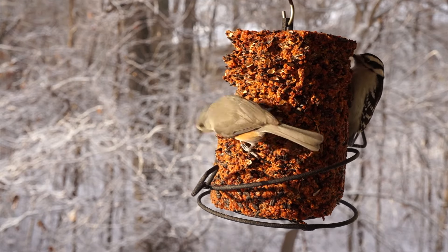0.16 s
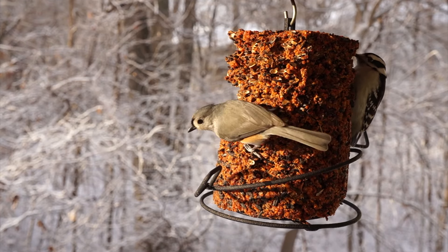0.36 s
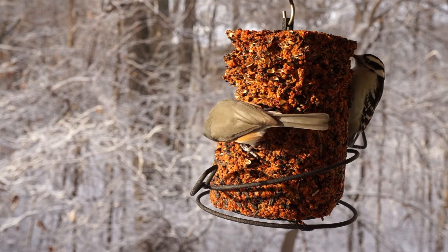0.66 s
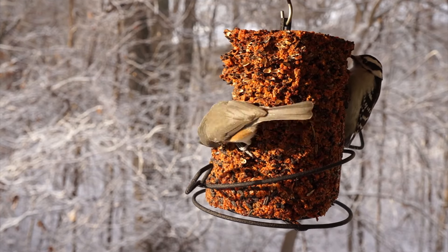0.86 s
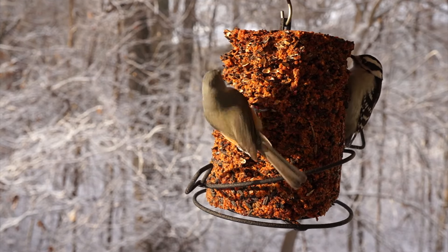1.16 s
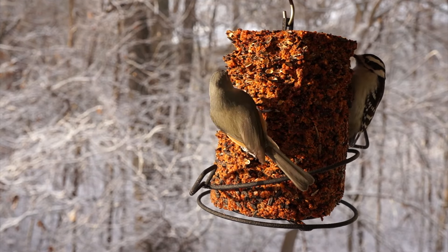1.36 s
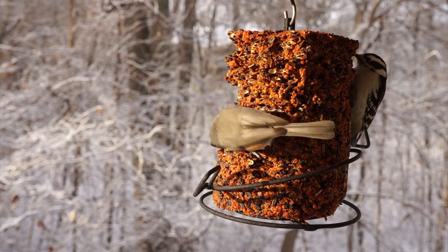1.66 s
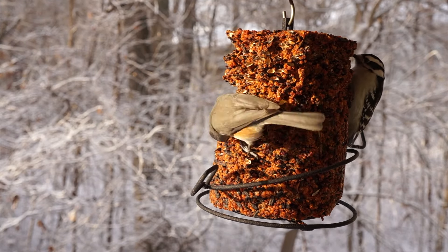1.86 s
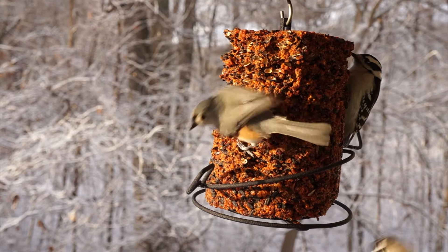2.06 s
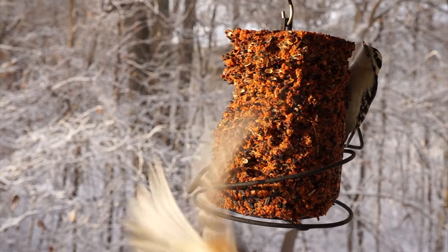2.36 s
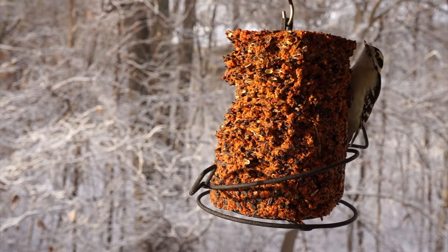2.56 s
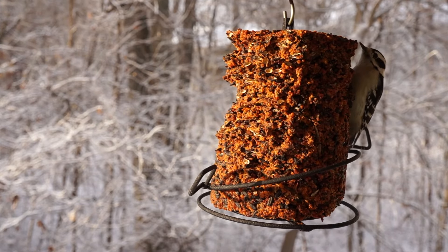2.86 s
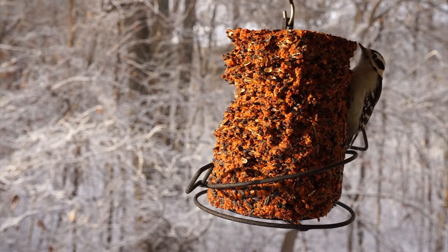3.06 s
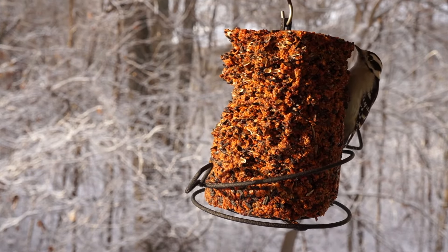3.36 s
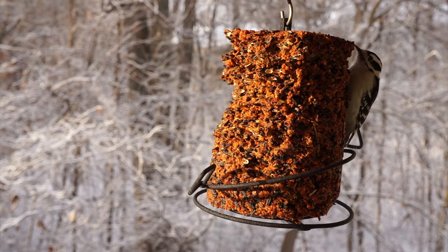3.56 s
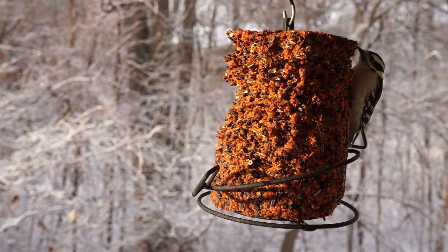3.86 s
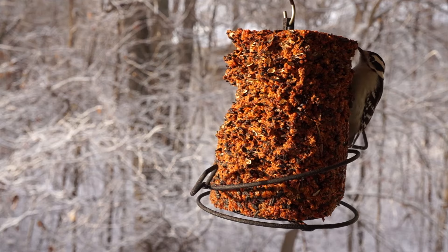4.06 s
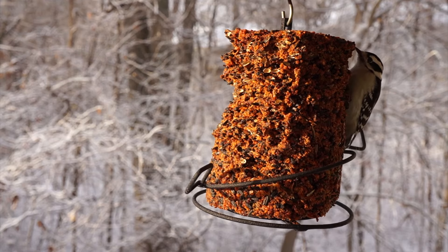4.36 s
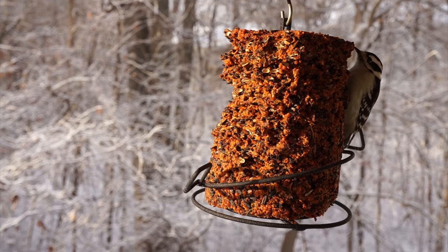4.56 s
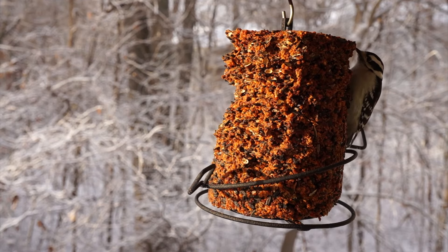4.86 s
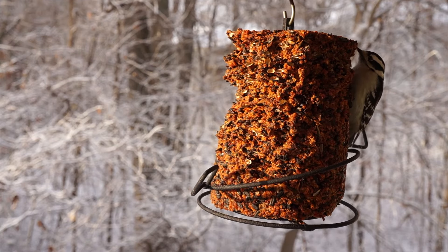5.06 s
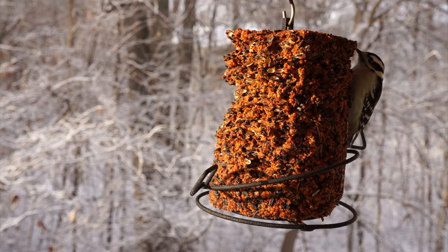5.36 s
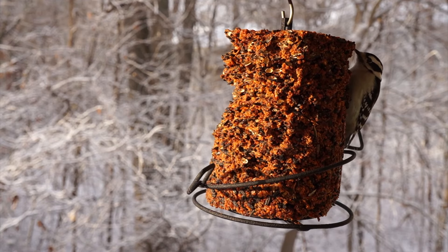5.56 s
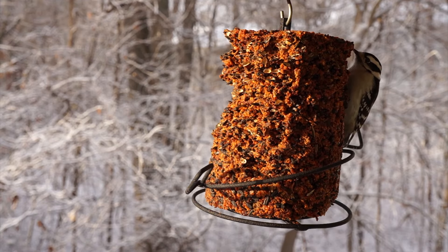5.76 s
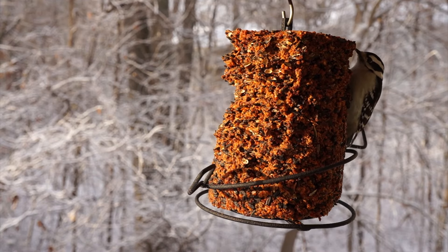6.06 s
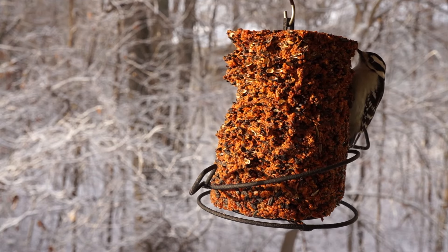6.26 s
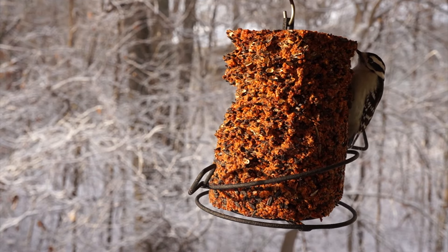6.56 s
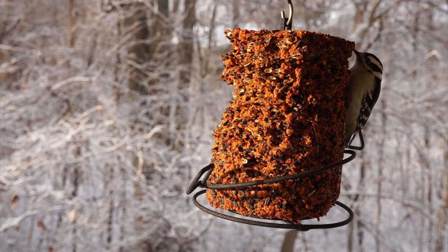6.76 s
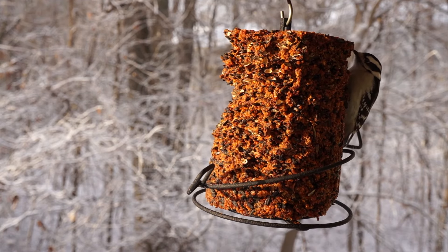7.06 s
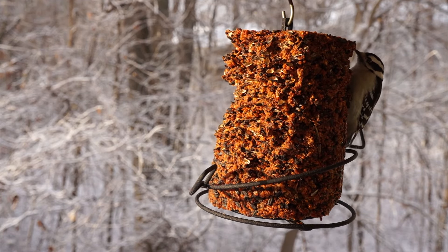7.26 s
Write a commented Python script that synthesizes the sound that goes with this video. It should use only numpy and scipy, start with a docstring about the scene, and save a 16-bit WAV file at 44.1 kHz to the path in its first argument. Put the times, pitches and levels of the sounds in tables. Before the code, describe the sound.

A soft, deep rumble with a fuzzy hum, like distant traffic, lies under everything in open winter woods. From the start a bird pecks sparsely at the seed cake, light woody ticks with a short echo among trees. Very faint tones ring away, a low drone swells and fades around 1-3.2 s, and tiny high chirps sound at 1.3 s. At 2.3 s wings flutter past: rapid feathery swishes, bassy air puffs and slaps until about 3 s. A strong gust and loud knocks then open a close, brittle burst of cracking and scraping at 3.0-3.3 s; the background dips briefly after sharp cracks. Smaller snaps follow to 4 s, crisp clicks around 4.2-4.4 s and crunching with a dull thud at 4.7 s. A quieter gap holds faint chirps near 5.3 s. Dense crackling and knocks return at 5.8-6.4 s, then five faint wingbeats from 6.6 s and rumble.

```python
"""Small birds at a seed-cake feeder in winter woods, 7.4 s, over a distant rumble (shaped noise plus hum).
From the start a bird pecks farther off (struck resonances, woodland echo); two faint tones ring away, a low
drone passes at 1-3.2 s and calls (bent sines) sound from 1.3 s. At 2.3 s wings flutter past (pulsed noise, air
slaps); from 3.0 s husks crack and scrape close by (slips through resonances) over dull knocks (damped swings).
Five faint wingbeats end it at 6.6 s. The recorder's limiter ducks everything after the sharpest cracks."""
import sys
import numpy as np
from scipy import signal
from scipy.io import wavfile
from scipy.ndimage import uniform_filter1d

SR = 44100
rng = np.random.default_rng(int(sys.argv[2]) if len(sys.argv) > 2 else 0)


def transcribe(signal):
    """Save signal, clipped to [-1, 1], as a 16-bit WAV file at the path in sys.argv[1]."""
    frames = np.atleast_2d(signal).T
    limited = np.clip(frames, -1, 1)
    pcm = np.round(limited * 32767).astype(np.int16)
    wavfile.write(sys.argv[1], SR, pcm)


N = 326340

# rumble spectrum: f/Hz, density/dB per Hz (relative)
RUMBLE_SPECTRUM = [(15, -28), (30, -25.5), (80, -3.5), (160, 0), (300, -7.5), (1000, -14), (1500, -22.5),
                   (4000, -40.5), (11000, -43)]
# rumble left-right likeness: f/Hz, correlation/1
RUMBLE_LIKENESS = [(150, 1), (400, 0.9), (1200, 0.65), (3000, 0.7), (8000, 1)]
# slow course of the rumble: t/s, level/dB
RUMBLE_SWELL = [(0, -36), (5, -36), (5.7, -35), (6.6, -38.5), (7.4, -39)]
# husk resonances: f/Hz, width/Hz, level/dB (relative)
HUSK_MODES = [(1430, 3100, -7.5), (2450, 700, 3.5), (3714, 850, 1.5), (3797, 94, -3.5), (4760, 2760, 4.5),
              (6770, 1840, 1.5), (8180, 1200, 2), (10830, 4300, 2)]
# beak blows on the cake, farther off: t/s, level/dB (relative)
PECK_BLOWS = [(0.0034, -46.5), (0.6541, -41.5), (0.8313, -44), (0.948, -49), (1.7114, -43.5),
              (1.959, -39.5), (2.142, -47.5), (2.3104, -36), (2.3194, -34), (3.285, -40.5), (3.3563, -36),
              (4.333, -44), (5.3875, -53.5), (5.985, -49.5), (6.816, -57)]
# faint far tones, dying slowly: t/s, f/Hz, level/dB
RINGING_TONES = [(0.029, 1590, -49.5), (0.581, 1330, -55)]
# course of the passing drone: t/s, f/Hz, level/dB
DRONE_PATH = [(1, 190, -72), (1.6, 189.9, -41), (2.2, 190.2, -38), (3.2, 188, -51.5)]
# calls in the trees: t/s, length/s, first f/Hz, middle f/Hz, last f/Hz, level/dB (relative)
TREE_CALLS = [(1.293, 0.015, 6200, 7260, 7500, -47.5), (1.343, 0.041, 7550, 8170, 8350, -60),
              (5.263, 0.034, 7200, 7860, 8500, -59), (5.433, 0.1, 7750, 7200, 7500, -65)]
# wingbeats of the departing bird, then two lurches of air at the feeder:
# t/s, feather swish level/dB, air push level/dB (both relative)
WINGBEATS = [(2.273, -29, -40), (2.321, -33, -24), (2.355, -38, -34), (2.391, -30.5, -19),
             (2.439, -36, -37), (2.48, -33.5, -20.5), (2.525, -34.5, -18), (2.574, -37, -26),
             (2.62, -34.5, -22), (2.667, -37.5, -24.5), (2.726, -38, -26.5), (2.767, -31.5, -17.5),
             (2.811, -32, -19.5), (2.855, -33, -20.5), (2.919, -33.5, -19), (2.957, -45, -34.5),
             (3.083, -23.5, -6.5), (3.143, -24, -16)]
# feather swish spectrum: f/Hz, density/dB per Hz (relative)
SWISH_SPECTRUM = [(200, -14), (400, 0.5), (1800, -8.5), (4000, -21), (11000, -23)]
# feather swish left-right likeness: f/Hz, correlation/1
SWISH_LIKENESS = [(300, .3), (2500, .4), (7000, .9)]
# air push spectrum: f/Hz, density/dB per Hz (relative)
PUSH_SPECTRUM = [(15, 2.0), (55, -3.5), (200, -11.0), (700, -32.5), (3000, -84)]
# air push left-right likeness: f/Hz, correlation/1
PUSH_LIKENESS = [(60, 0.96), (300, 0.37)]
# sudden slaps of air within the flutter: t/s, level/dB (relative)
AIR_SLAPS = [(2.288, -15), (2.483, -16), (2.802, -22), (2.848, -9)]
# husks snapping close by: t/s, level/dB (relative), treble over body/dB
HUSK_SNAPS = [(3.028, -27.5, 18), (3.042, -22, 10), (3.183, -13, 0), (3.218, -13.5, 2), (3.264, -24, -9),
              (3.375, -26.5, -7), (3.432, -42.5, -11), (3.531, -29, -11), (3.561, -29.5, -6),
              (3.572, -37, 4), (3.597, -25, 7), (3.874, -28.5, -1), (3.9585, -25.5, 0), (4.309, -29.5, -27),
              (4.353, -33, -2), (4.395, -31, -4), (4.4, -29, 3), (4.465, -41, -9), (4.724, -27.5, -18),
              (4.756, -19.5, -9), (4.815, -27.5, 7.5), (5.821, -32.5, 9), (5.885, -30, -2), (5.934, -26, 7),
              (5.96, -40, 11), (6.143, -20.5, 3.5), (6.225, -19, -12), (6.298, -18, 9), (6.307, -20, 8),
              (6.337, -28, 6), (6.422, -24, 6)]
# beak scraping and crunching close by: t/s, length/s, level/dB (relative), treble over body/dB
BEAK_SCRAPES = [(3.035, 0.0087, -38, 17), (3.045, 0.0092, -24, 14), (3.055, 0.031, -18.5, 8.5),
                (3.096, 0.0088, -20, 9), (3.132, 0.028, -27.5, 0), (3.156, 0.017, -21, 2),
                (3.168, 0.016, -20.5, -16), (3.204, 0.0088, -18, -1), (3.228, 0.018, -37, 4),
                (3.535, 0.029, -54, 1), (3.588, 0.0036, -16, 11), (3.859, 0.012, -44.5, -1),
                (3.896, 0.0091, -32, -10), (3.92, 0.031, -46, 9), (4.1555, 0.0047, -23, -5),
                (4.251, 0.0067, -28, 8), (4.261, 0.0054, -13.5, 12.5), (4.679, 0.034, -39.5, 2.5),
                (4.734, 0.016, -42, 0), (4.76, 0.02, -29.5, 4.5), (4.784, 0.025, -36, 8),
                (5.834, 0.043, -37.5, -1), (5.899, 0.029, -31, -8), (6.105, 0.021, -29.5, -1),
                (6.134, 0.0044, -27.5, 15), (6.146, 0.037, -30.5, 7), (6.175, 0.018, -26, 8),
                (6.193, 0.022, -22, 2), (6.213, 0.024, -27.5, 8), (6.245, 0.012, -21, 6.5),
                (6.26, 0.014, -24, -7), (6.275, 0.022, -32, -8), (6.345, 0.0071, -21.5, 8),
                (6.363, 0.03, -41.5, -10), (6.4, 0.018, -26.5, 8)]
# dull knocks through the feeder: t/s, level/dB (relative)
FEEDER_KNOCKS = [(3.035, -16), (3.104, -5.5), (3.208, -9), (3.258, -18.5), (3.897, -19), (3.921, -21.5),
                 (4.722, -17.5), (5.897, -23), (5.924, -19), (6.109, -22), (6.1345, -17.5), (6.138, -19),
                 (6.16, -29), (6.246, -17.5), (6.29, -23)]

SNAP_S, DYING_DB_PER_S = 0.0025, 6995  # length of a snap; extra decay once any husk event has run its length
RINGING_DB_PER_S = -26
CALL_ENDS_DB, CALL_OPENING = 2, 0.42  # boost at both ends of a call; share over which the opening boost fades
FAR_FLIGHT_S, FAR_BEAT_S, FAR_BEAT_DB = 6.62, 0.0448, -45  # start, spacing, level of five even beats
LIMIT_DB, ATTACK_SAMPLES = -20.5, 130  # threshold; slow enough to let the first edge of a crack through
QUICK_S, SLOW_S = 0.082, 0.71  # limiter recovery time constants
EDGE_HZ = 11080  # band limit


def amp(db):
    """Gain of a dB value."""
    return 10 ** (np.asarray(db) / 20)


def evened(x):
    """Scales to rms 1."""
    return x / np.sqrt(np.mean(x ** 2) + 1e-20)


def drift(count, size):
    """Twice-smoothed random course of rms 1."""
    once = uniform_filter1d(rng.standard_normal(count), size=size)
    return evened(uniform_filter1d(once, size=size))


def read(points, hz):
    """Reads a spectrum table on a log-frequency axis."""
    f, value = np.transpose(points)
    return np.interp(np.log(hz + 1), np.log(f + 1), value)


def add(mix, start_s, sound):
    """Mixes a sound in at start_s, cut at the end of the mix."""
    part = mix[..., round(start_s * SR):][..., :sound.shape[-1]]
    part += sound[..., :part.shape[-1]]


def ring(x, hz, width_hz):
    """Fixed resonance that keeps the power of white noise."""
    r = np.exp(-np.pi * width_hz / SR)
    pole = r * np.exp(2j * np.pi * hz / SR)
    return np.sqrt(2 * (1 - r * r)) * signal.lfilter([1], [1, -pole], x).real


def steep(x, hz, width_hz):
    """Resonance applied twice, so the valleys beside it stay dark."""
    return np.sqrt(2 * np.pi * width_hz / SR) * ring(ring(x, hz, width_hz), hz, width_hz)


def noise(spectrum, likeness, patchy_db):
    """Stereo noise of rms 1 from random short-time spectra with drifting patches."""
    frames, hz = N // 256 + 5, np.fft.rfftfreq(1024, 1 / SR)
    a, b, c, d, patches = rng.standard_normal((frames, 513, 5)).T
    patches = uniform_filter1d(patches, size=10, axis=0)  # across frequency
    patches = evened(uniform_filter1d(patches, size=12, axis=1))  # across time
    same = np.clip(read(likeness, hz), -1, 1)[:, None]
    left = a + 1j * b
    right = same * left + np.sqrt(1 - same ** 2) * (c + 1j * d)
    level_db = read(spectrum, hz)[:, None] + patchy_db * patches
    z = np.array([left, right]) * amp(level_db)
    return evened(signal.istft(z, nperseg=1024, noverlap=768)[1][:, :N])


def woods(x, t60_s):
    """Echoes from trunks: a dying tail of random taps, another for each ear."""
    t = np.arange(SR // 2) / SR
    tail = rng.standard_normal((2, len(t))) * amp(-60 * t / t60_s)
    return signal.fftconvolve(x[None], tail / np.linalg.norm(tail[0]), axes=1)[:, :N]


def whistle(rows, waver):
    """Start time and samples of a near sine with wavering pitch; rows are t/s, f/Hz, level/dB."""
    s, hz, db = np.transpose(rows)
    t = np.arange(s[0], s[-1], 1 / SR)
    wobble = evened(uniform_filter1d(rng.standard_normal(len(t)), size=400))
    turns = np.cumsum(np.interp(t, s, hz) * (1 + waver * wobble)) / SR
    level = np.sqrt(2) * amp(np.interp(t, s, db))
    return s[0], level * np.sin(2 * np.pi * turns) * signal.windows.tukey(len(t), .015)


def husk(rows, slips_per_s, spread_db, grit, turn_db):
    """Runs of small uneven slips drive the modes, whose mix shifts as the husk turns in the beak."""
    modes = len(HUSK_MODES)
    treble = np.tanh(2 * np.log2(np.array(HUSK_MODES)[:, 0] / 5300)) / 2  # body -0.5, treble +0.5
    turning = evened(uniform_filter1d(rng.standard_normal((N // 100 + 1, modes)), size=8, axis=0))
    turning = np.repeat(amp(turn_db * turning.T), 100, axis=1)[:, :N]

    slips = amp(spread_db * np.minimum(rng.exponential(1, N), 3))
    slips *= rng.random(N) < slips_per_s / SR
    slips = evened(slips * rng.choice([-1., 1.], N)) + grit * rng.standard_normal(N)
    slips *= amp(1.6 * drift(N, 200))  # clumps of slips

    drive = np.zeros((modes, N))
    for s, length_s, db, treble_db in rows:
        t = np.arange(round((length_s + .008) * SR)) / SR
        rise = np.minimum(t / min(.35 * length_s, .007), 1) ** 2
        decay_db = -2 * t / length_s - DYING_DB_PER_S * np.maximum(t - length_s, 0)
        run = rise * amp(decay_db) * slips[round(s * SR):][:len(t)]
        run /= np.sqrt(np.sum(run ** 2) / (length_s * SR))
        add(drive, s, amp(db) * evened(amp(treble * treble_db))[:, None] * run)

    gains = amp([db for _, _, db in HUSK_MODES])
    gains /= np.linalg.norm(gains)
    gains *= (-1.) ** np.arange(modes)  # alternating polarity
    return sum(gains[k] * steep(drive[k] * turning[k], hz, width_hz)
               for k, (hz, width_hz, _) in enumerate(HUSK_MODES))


def swings():
    """Time, slow swing and quick jolt: damped sines that start as a pull."""
    t = np.arange(2000) / SR
    swing = -np.sin(2 * np.pi * 280 * t) * np.exp(-500 * t)
    jolt = -np.sin(2 * np.pi * 520 * t) * np.exp(-1100 * t)
    return t, swing, jolt


def rumble():
    """Distant traffic and air with a deep fuzzy hum, swelling slowly, a little stronger on the left."""
    s, db = np.transpose(RUMBLE_SWELL)
    hum = amp(-6.5) * evened(steep(rng.standard_normal(N), 53.8, 7.3))
    level_db = np.interp(np.arange(N) / SR, s, db) + [[.5], [-.5]]
    return amp(level_db) * (noise(RUMBLE_SPECTRUM, RUMBLE_LIKENESS, patchy_db=0.88) + hum)


def pecks():
    """Short distant blows: a sharp tick, the husk's crack, a brief low ring and a woodland tail."""
    ticks = np.zeros(N)
    for s, db in PECK_BLOWS:
        add(ticks, s, amp(db) * np.ones(1))
    rows = [(s, SNAP_S, db, -9) for s, db in PECK_BLOWS]
    crack = husk(rows, slips_per_s=4000, spread_db=2, grit=1, turn_db=1.5)
    tick = amp(19.5) * ring(ticks, 3000, 5000)
    low_ring = amp(20) * steep(ticks, 1524, 170)
    blows = amp(1.0) * crack + tick + low_ring
    return blows + amp(0.5) * woods(blows, t60_s=0.22)


def ringing():
    """Two faint tones far off, each a near sine dying for a second."""
    out = np.zeros(N)
    for s, hz, db in RINGING_TONES:
        add(out, *whistle([(s, hz, db), (s + 1, hz, db + RINGING_DB_PER_S)], waver=0.0014))
    return out


def drone():
    """A low wavering near sine that swells and fades as it passes."""
    out = np.zeros(N)
    add(out, *whistle(DRONE_PATH, waver=0.027))
    return out


def calls():
    """Near sines, each one smooth bend of pitch, smeared by the trees."""
    out, u = np.zeros(N), np.linspace(0, 1, num=9)
    for s, length_s, first_hz, middle_hz, last_hz, db in TREE_CALLS:
        hz = first_hz * (1 - u) * (1 - 2 * u)  # parabola through the three pitches
        hz += middle_hz * 4 * u * (1 - u) + last_hz * u * (2 * u - 1)
        level_db = db + CALL_ENDS_DB * np.maximum(1 - u / CALL_OPENING, u)
        add(out, *whistle(np.transpose([s + length_s * u, hz, level_db]), waver=.008))
    return amp(-3) * out + woods(out, t60_s=.45)


def wings():
    """Each beat is a swish of feathers and a turbulent push of air on the microphones."""
    swish, push, t = np.zeros(N), np.zeros(N), np.arange(round(.12 * SR)) / SR
    far = [(FAR_FLIGHT_S + k * FAR_BEAT_S, FAR_BEAT_DB, FAR_BEAT_DB) for k in range(5)]
    for s, swish_db, push_db in WINGBEATS + far:
        add(swish, s, amp(swish_db) * np.minimum(t / 0.007, 1) * np.exp(-t / 0.042))
        add(push, s, amp(push_db) * (t / 0.022) * np.exp(1 - t / 0.013))
    feathers = noise(SWISH_SPECTRUM, SWISH_LIKENESS, patchy_db=2)
    air = noise(PUSH_SPECTRUM, PUSH_LIKENESS, patchy_db=1.5)
    rustle = amp(1.3 * drift(N, 250))
    return swish * rustle * feathers + push * air


def slaps():
    """Slaps of air: a strong quick jolt on a slower damped swing, alike in both ears."""
    out = np.zeros((2, N))
    _, swing, jolt = swings()
    for s, db in AIR_SLAPS:
        add(out, s, amp(db) * (swing + 1.2 * jolt)[None])
    return out


def close_husks():
    """One draw of the close slips: scrapes plus denser, grittier snaps."""
    snaps = [(s, SNAP_S, db, treble_db) for s, db, treble_db in HUSK_SNAPS]
    scraping = husk(BEAK_SCRAPES, slips_per_s=2700, spread_db=5.5, grit=0.78, turn_db=4.0)
    return scraping + husk(snaps, slips_per_s=5500, spread_db=3.5, grit=1.6, turn_db=2.5)


def cracks():
    """Close husks, almost dry; part of the body differs between microphones, the echo is duller."""
    near, other = close_husks(), close_husks()
    dull = signal.butter(2, 4500, fs=SR)
    side = amp(-5.5) * signal.lfilter(*dull, other)
    echo = amp(-11) * woods(signal.lfilter(*dull, near), t60_s=0.08)
    return near + np.array([side, -side]) + echo


def knocks():
    """A quick jolt on a slower damped swing, with a woody rattle of the cake unlike in each ear."""
    out = np.zeros((2, N))
    t, swing, jolt = swings()
    rattles = rng.standard_normal((len(FEEDER_KNOCKS), 2, len(t))) * np.exp(-t / 0.011)
    for (s, db), rattle in zip(FEEDER_KNOCKS, rattles):
        add(out, s, amp(db) * (jolt + 0.9 * swing + 0.18 * steep(rattle, 610, 2900)))
    return out


def scene():
    """All sources at the two microphones."""
    far = rumble() + pecks() + ringing() + drone() + calls()
    return far + wings() + slaps() + cracks() + knocks()


def record(dry):
    """A treble-sensing limiter ducks and lets go in a quick and a slow stage; then the band limit."""
    sharp = signal.lfilter([1, -.9], [1], dry.mean(0))
    power_db = 10 * np.log10(abs(uniform_filter1d(sharp ** 2, size=40)) + 1e-12)
    over = np.log(np.maximum(power_db - LIMIT_DB, 1e-3))
    t = np.arange(N) / SR
    # peak hold: dB of overshoot, decaying exponentially
    quick_db = np.exp(np.maximum.accumulate(over + t / QUICK_S) - t / QUICK_S)
    slow_db = np.exp(np.maximum.accumulate(over + t / SLOW_S) - t / SLOW_S)
    attack = np.ones(ATTACK_SAMPLES) / ATTACK_SAMPLES
    duck_db = signal.lfilter(attack, [1], 0.9 * quick_db + 0.41 * slow_db)
    band = signal.firwin(255, EDGE_HZ, window=("kaiser", 9), fs=SR)
    return signal.oaconvolve(dry / amp(duck_db), band[None], "same")


dry = scene()
out = record(dry)
transcribe(out)
```